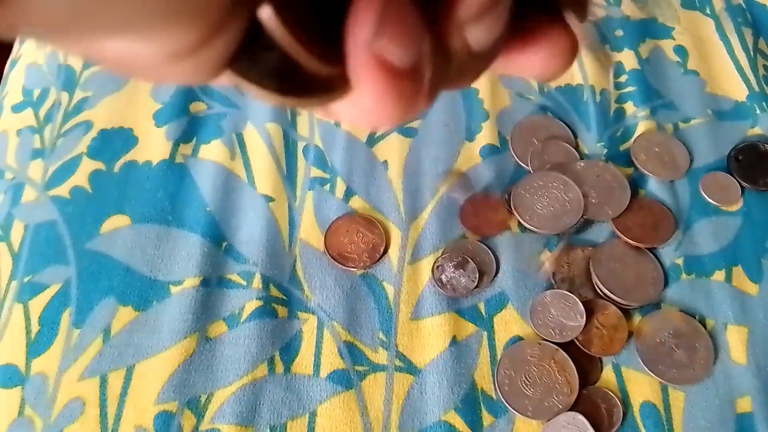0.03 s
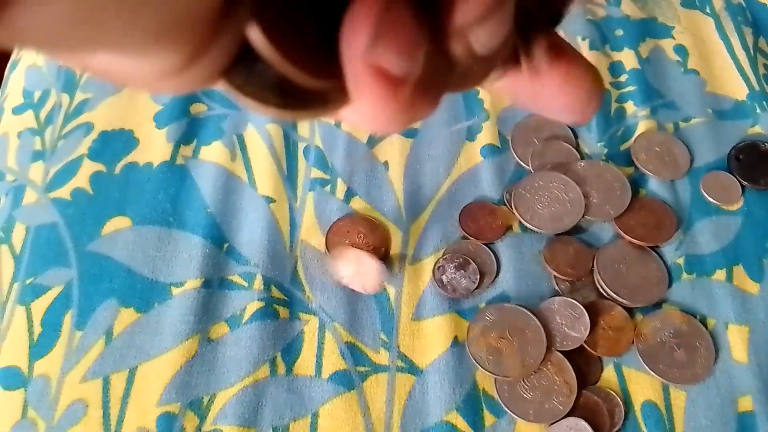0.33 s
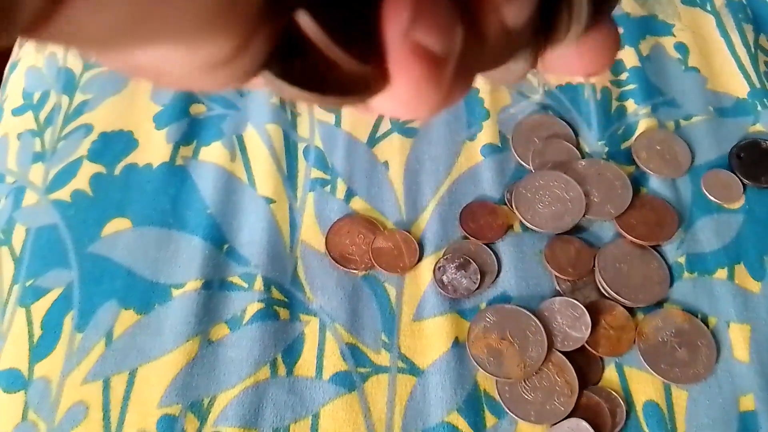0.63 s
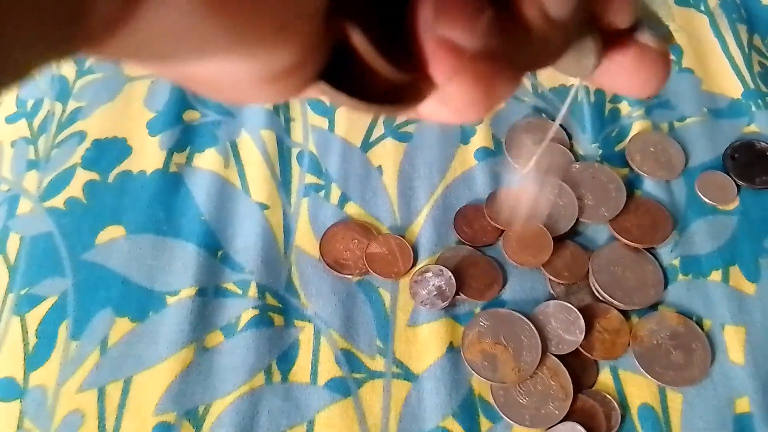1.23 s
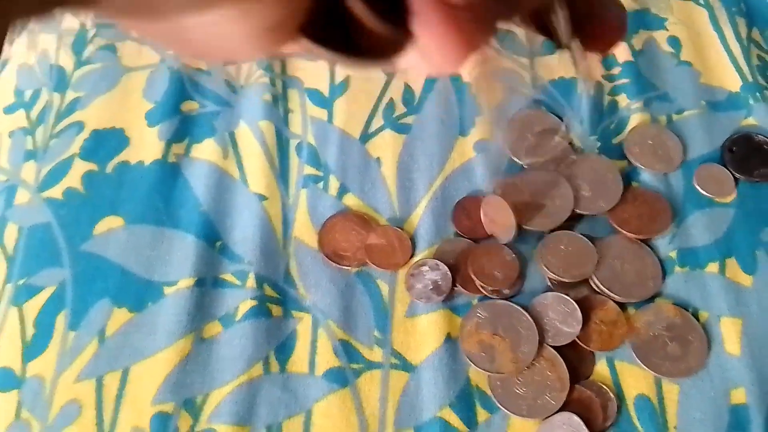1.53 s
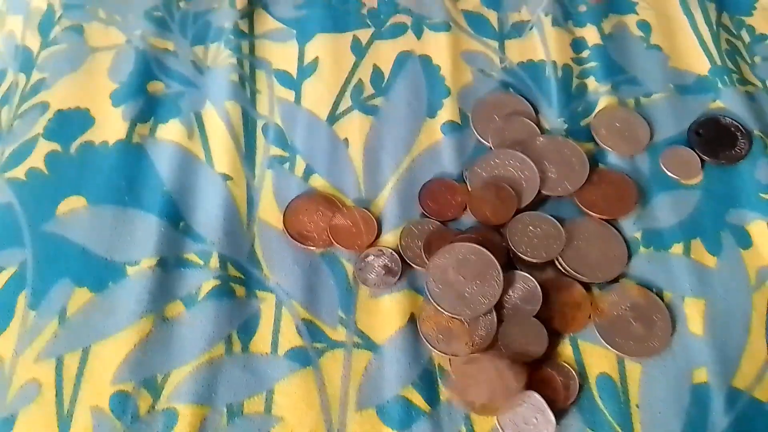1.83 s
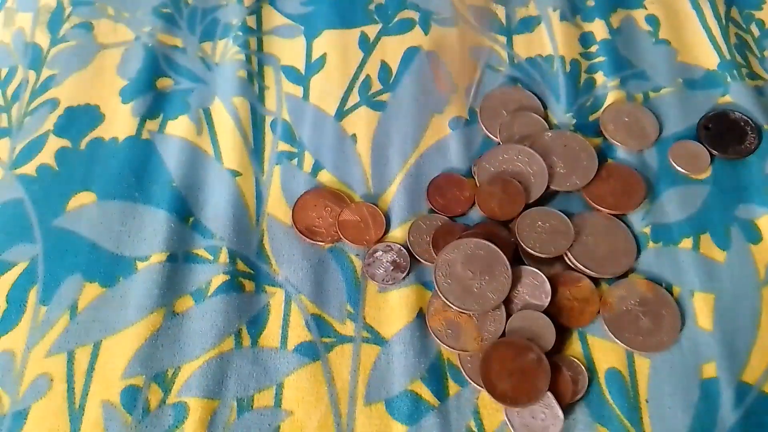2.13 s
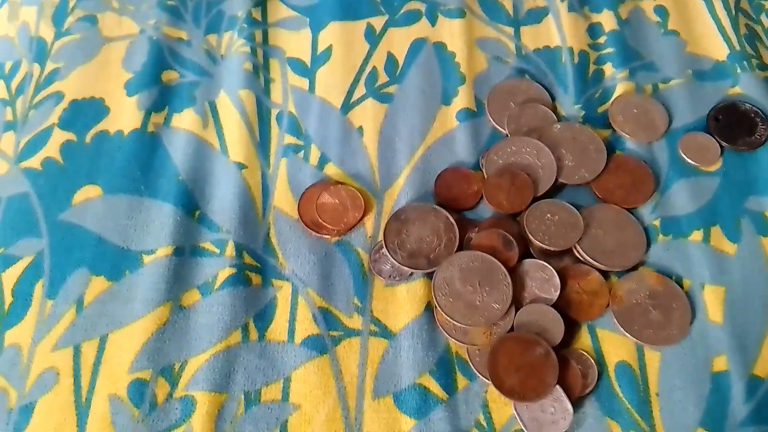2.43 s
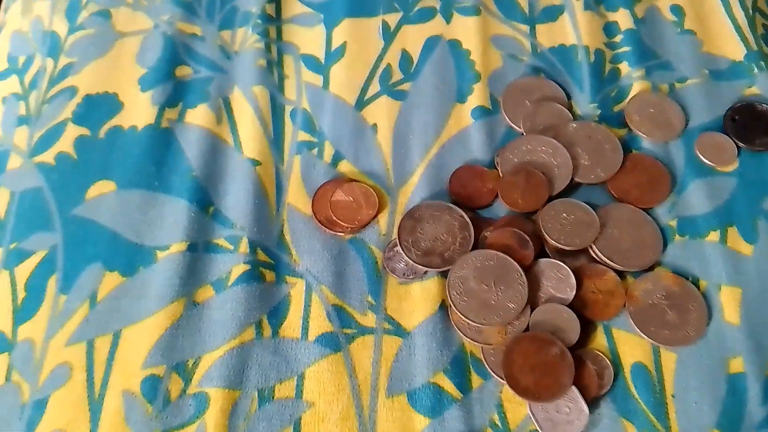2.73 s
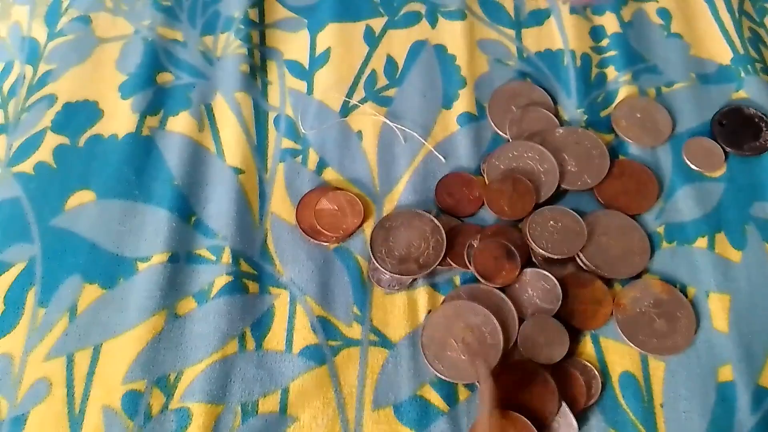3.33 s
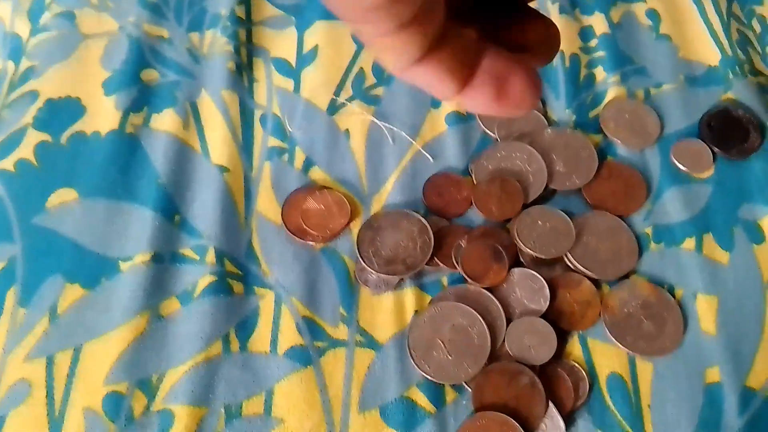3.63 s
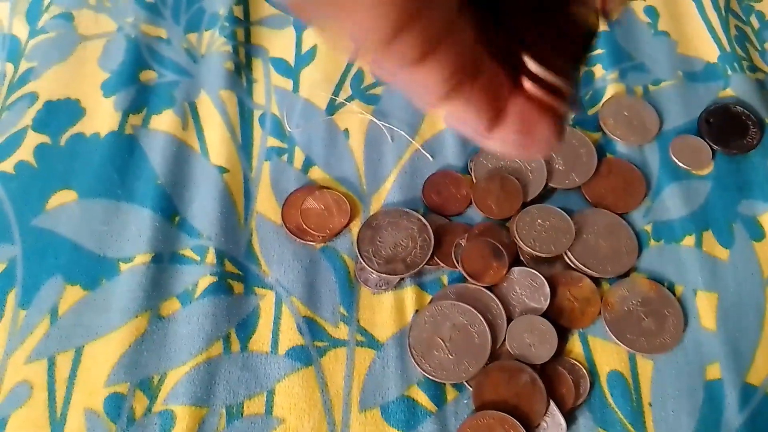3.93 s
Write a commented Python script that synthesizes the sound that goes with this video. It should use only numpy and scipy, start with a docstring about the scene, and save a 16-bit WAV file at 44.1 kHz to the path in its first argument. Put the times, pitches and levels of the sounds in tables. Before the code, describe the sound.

Coins fall from a hand onto a pile of coins on cloth, clinking in irregular clusters with brief, bright ringing. Faint ticks and scrapes come between the drops. The close microphone overloads slightly in a quiet room.

```python
"""Coins dropped on a pile of coins

Coins fall from a hand onto a pile on cloth, right under a small microphone in a quiet room.
Each impact excites a coin's high modes of free vibration and jostles its neighbours into tiny pings.
It also overloads the microphone, whose nonlinear response adds a crunch, a thump and difference tones.
Between the drops, coins shift against each other with faint ticks and scrapes."""
import sys
import numpy as np
from scipy import signal
from scipy.fft import rfft, irfft
from scipy.io import wavfile

SR = 44100
rng = np.random.default_rng(int(sys.argv[2]) if len(sys.argv) > 2 else 0)


def master_out(mix):
    """Clip the mix to full scale and print it as 16-bit PCM to the path in sys.argv[1]."""
    frames = np.transpose(np.atleast_2d(mix))
    ceiling = np.clip(frames, -1, 1)
    pcm = np.round(ceiling * 32767).astype(np.int16)
    wavfile.write(sys.argv[1], SR, pcm)


N = 176400

# impacts of coin on coin; the sag is the fall of the crunch over its length, the thump is relative to it:
# start_s, crunch_db, crunch_length_s, sag_db, thump_db, coin, ring_db, ring_length_s
IMPACTS = [ (0.0661, -16.5, 0.028, 38, -2.5, "l", -45.5, 0.24),
           (0.1539, -14.5, 0.14, 16.5, 0, "a", -36.5, 0.53), (0.271, -25, 0.0089, 1.5, -4, "a", -30.5, .17),
           (.385, -16.5, 0.0038, 8.5, 6, "j", -34, 0.31), (0.4195, -21, 0.0019, 3, 3, "k", -65, 0.044),
           (0.4256, -17.5, 0.011, 9, 1, "j", -40, .25), (0.776, -30.5, 0.0021, 0.5, 0.5, "l", -57, 1),
           (.851, -22.5, 0.0024, -3.5, -6, "l", -43, .15), (.874, -18, 0.015, 15, 7.5, "b", -44, .1),
           (.887, -14.5, 0.089, 11.5, -1, "b", -47, 0.14), (0.94, -27, 0.033, 1, -15, "b", -53, .2),
           (0.98, -22.5, 0.024, 4, 1, "b", -52, 0.16), (1.022, -20, 0.0078, 19.5, 4, "c", -47, 0.13),
           (1.032, -36, 0.013, 5, -13, "c", -52, 0.068), (1.246, -17, 0.055, 19.5, 4, "c", -44.5, 0.31),
           (1.329, -26.5, 0.0008, 5, 2, "c", -58, 0.088), (1.373, -28, .004, 10, -1, "c", -52, .1),
           (1.379, -23, 0.0066, 8, -5, "c", -47, 0.087), (1.3922, -14, 0.086, 9.5, -1, "d", -38.5, 0.63),
           (1.555, -16.5, 0.072, 6, -1, "d", -46, 0.39), (1.619, -15, 0.069, 6, 2, "e", -36, 0.4),
           (1.690, -16, 0.0077, 6, 0.5, "d", -44, 0.33), (1.727, -22, 0.0073, 15.5, -6, "f", -44.5, 0.36),
           (1.79, -32, 0.0015, 0.5, -5, "f", -48, 0.18), (1.83, -27.5, 0.011, 6, -6, "f", -29, 0.26),
           (1.844, -21.5, 0.054, 2, -4.5, "f", -38.5, 0.28), (2.161, -14, 0.078, 9.5, 1.5, "g", -38, 0.32),
           (2.242, -18, 0.02, 4, -2, "g", -48.5, 0.25), (2.282, -41, .003, 7, -3, "c", -41, 0.034),
           (2.492, -22, .001, 7.5, 1, "h", -40, 0.27), (2.517, -26.5, 0.00064, 2.5, 3, "h", -51, .25),
           (2.5997, -23.5, 0.01, 3.5, -2.5, "h", -34, 0.12), (2.816, -17.5, .014, 9, -8, "h", -34, 0.17),
           (2.867, -20.5, 0.0075, 3, -2, "i", -41, 0.12), (2.892, -17.5, 0.017, 8, -6.5, "h", -35, 0.16),
           (2.918, -24, 0.0015, 2.5, -8, "i", -39.5, 0.074), (2.956, -32, 0.0018, 10, -11, "k", -54, .08),
           (2.974, -29, 0.0029, 4, -9, "i", -37, 0.1), (3.010, -16, 0.062, 9.5, 5.5, "g", -35, 0.35),
           (3.070, -16, .026, 3.5, -18, "e", -38, 0.44), (3.096, -15.5, 0.05, 3, 6.5, "e", -34, 0.42),
           (3.151, -16.5, 0.048, 3.5, -1, "g", -51, .3), (3.19, -23.5, 0.042, -3.5, 0.5, "g", -35.5, 0.21),
           (3.2234, -11.5, .009, 14, -9, "b", -50, 0.087), (3.255, -22, 0.0072, -6, -10, "e", -29.5, 0.19),
           (3.275, -30.5, 0.0054, 2, 3, "k", -43, 0.18), (3.292, -24, 0.014, 12, -15, "h", -46, .3),
           (3.6177, -17, 0.0055, 7.5, -19, "k", -37, 0.034), (3.637, -33, 0.016, 0, 4, "k", -41.5, 0.11),
           (3.643, -14.5, 0.0048, 13, -2, "e", -39, 0.073), (3.667, -19.5, 0.0022, 23, -4, "k", -45, .05),
           (3.676, -25, .001, 13, -6, "k", -47, 0.058), (3.691, -18, 0.0047, 14, -9, "k", -47, .07),
           (3.828, -18.5, 0.0027, 15.5, -5, "k", -37, .06), (3.833, -20.5, 0.0074, 9.5, 0, "k", -41, .06)]
ATTACK_S = 0.00052


def undb(db):
    """Amplitude ratio of a level in decibels."""
    return 10 ** (np.asarray(db) / 20)


def noise(spectrum):
    """White noise filtered to a spectrum of (frequency_hz, level_db) points, at rms 1."""
    hz, db = np.array(spectrum).T
    bins_hz = np.maximum(np.arange(N // 2 + 1) * SR / N, 1)
    gain = undb(np.interp(np.log(bins_hz), np.log(hz), db))
    x = irfft(rfft(rng.standard_normal(N)) * gain, N)
    return x / x.std()


def wander(rate_hz):
    """Random modulation of standard deviation 1, interpolated between rate_hz values a second."""
    x = np.interp(np.arange(N) * rate_hz / SR, np.arange(N), rng.standard_normal(N))
    return x / x.std()


def since(start, length):
    """Sample indices of an event, and their age in seconds."""
    i = np.arange(max(int(start * SR) + 1, 0), min(int((start + length) * SR), N))
    return i, i / SR - start


def room():
    """Background noise: a steady broadband hiss and a low hum that wavers by phase modulation."""
    # spectrum of the hiss: frequency_hz, level_db
    hiss_spectrum = [(15, -19), (50, -12), (120, -18), (300, -13), (400, -19.5), (750, -17.5), (1000, -21),
                     (2200, -15.5), (3500, -24.5), (6000, -38.5), (7200, -34), (9500, -44), (11000, -52),
                     (14400, -46), (16000, -56)]
    partials = [(86, -66.5), (170, -58.5), (258, -59.5), (340, -62.5)]  # pitch_hz, level_db
    t = np.arange(N) / SR
    hum = sum(undb(db) * np.sqrt(2) * np.sin(2 * np.pi * hz * t + 0.92 * wander(24))
              for hz, db in partials)
    return undb(-50) * noise(hiss_spectrum) + hum


def shifting():
    """Light contact and sliding friction between coins make decaying ticks and uneven scrapes of noise."""
    # ticks of shifting coins: start_s, level_db
    ticks = [(0.5235, -30), (0.6374, -30.5), (0.6536, -31), (0.6686, -33), (0.7008, -42), (0.755, -33),
             (0.8101, -25), (0.8171, -25), (1.0644, -37), (1.1727, -41), (2.0108, -46), (2.0394, -36.5),
             (2.0607, -41), (2.455, -34), (2.4686, -25), (2.4975, -17.5), (2.5095, -24.5), (2.519, -23),
             (2.575, -29), (2.8564, -43), (3.3352, -25.5), (3.3564, -28.5), (3.4506, -32), (3.578, -29.5),
             (3.7035, -37), (3.7104, -34), (3.8203, -22)]
    # coins sliding in the hand and on the pile: start_s, end_s, level_db
    slides = [(0, 0.105, -50.5), (0.607, 0.88, -61.5), (1.014, 1.11, -52), (1.99, 2.09, -67),
              (2.267, 2.372, -60), (2.38, 2.687, -54), (2.806, 2.983, -46), (3.236, 3.43, -55),
              (3.616, 3.717, -44), (3.79, 3.861, -47.5)]
    # spectrum of ticks and scrapes alike: frequency_hz, level_db
    contact_spectrum = [(500, -27), (3000, -6), (5000, -5), (7300, 2.5), (9500, -4.5), (12500, -23),
                        (15500, -12)]
    tick_decay_s = 0.0017
    ticking, scraping = np.zeros(N), np.zeros(N)
    for start, db in ticks:
        i, t = since(start, .03)
        ticking[i] += undb(db - 7) * np.exp(-t / tick_decay_s)
    for start, end, db in slides:
        i, t = since(start, end - start)
        scraping[i] += undb(db) * np.sqrt(np.abs(np.sin(np.pi * t / (end - start))))
    grain = undb(6 * np.minimum(wander(330), 2))
    grain /= np.sqrt(np.mean(grain ** 2))
    return (ticking + scraping * grain) * noise(contact_spectrum)


def overload():
    """Overload distortion: each impact drives the microphone into a crunch and thump that sag, then stop."""
    # spectrum of the broadband crunch: frequency_hz, level_db
    crunch_spectrum = [(150, -4.5), (400, -2.5), (900, -3), (1700, 0), (2800, -3.5), (4400, -9.5),
                       (5300, -15.5), (6500, -21.5), (9000, -25), (12000, -30.5), (14000, -34.5),
                       (15700, -26.5)]
    # spectrum of the low thump: frequency_hz, level_db
    thump_spectrum = [(15, -6.5), (40, 1.5), (100, -1.5), (140, -4), (230, -0.5), (450, -8), (900, -9),
                      (3000, -50)]
    snap_s, release_s, rattle_s = 0.00057, 0.0016, 0.016  # time constants
    crunch_power, thump_power = np.zeros(N), np.zeros(N)  # incoherent sounds add in power
    for start, db, length, sag_db, thump_db, *_ in IMPACTS:
        i, t = since(start, length + .12)
        sag = undb(-sag_db * np.minimum(t / length, 1) ** 1.47)
        snap = 1 + 0.44 * np.exp(-t / snap_s)  # extra bite at the instant of contact
        envelope = undb(db) * np.minimum(t / ATTACK_S, 1) * sag * snap
        after = np.maximum(t - length, 0)
        release = np.exp(-after / release_s)
        rattle = undb(-21) * np.exp(-after / rattle_s)
        crunch_power[i] += (envelope * (release + rattle)) ** 2
        thump_power[i] += (envelope * release * undb(thump_db)) ** 2 * sag
    grain = undb(1.03 * wander(169.5) + 0.73 * wander(1500))  # flutter and finer spikes
    grain /= np.sqrt(np.mean(grain ** 2))
    crunch = undb(-1.5) * np.sqrt(crunch_power) * noise(crunch_spectrum)
    thump = undb(-4.5) * np.sqrt(thump_power) * noise(thump_spectrum)
    return grain * (crunch + thump)


def ringing():
    """Free vibration: a struck coin rings in beating pairs of modes as it rocks, damped by the cloth."""
    # normal modes of each coin: pitch_hz, level_db
    modes = { "a": [(7224, 1), (9975, -15), (12200, -14), (15116, -18)], "b": [(6735, 2.5), (8979, -15),
             (10110, 8), (10680, 4), (11100, -14)], "c": [(10137, 1.5), (10610, -3), (13092, -4)],
             "d": [(6110, -23), (6891, -6), (8123, -9), (10524, -20), (11133, -9)], "e": [(6013, -18),
             (7197, -28), (9920, -12), (11575, -5), (12263, -13)], "f": [(9728, -22), (9921, 3.5)],
             "g": [(8137, 3.5), (9970, -1.5), (10680, -25), (11590, -26), (12610, -22)], "h": [(8527, -13),
             (12800, -13), (12931, -12), (14760, -5), (15735, -13)], "i": [(8485, 1.5), (8300, -1),
             (12800, -18), (14734, -6)], "j": [(12602, -18)], "k": [(6971, -8), (7623, -4), (9200, -2),
             (11256, -13), (14368, -4), (15682, -5)], "l": [(11133, -3)]}
    fall_db, steepening = 112, 1.69  # decay over the ring length, faster as the coin settles
    jitter_hz, mean_split_hz = 21.9, 40
    out = np.zeros(N)
    jitter_cycles = np.cumsum(jitter_hz * wander(250)) / SR
    rocking = undb(3.5 * wander(130))
    for start, *_, coin, db, length in IMPACTS:
        i, t = since(start, length)
        envelope = undb(db - 1 - fall_db * (t / length) ** steepening) * np.minimum(t / ATTACK_S, 1)
        for (hz, mode_db), (split, offset, weight) in zip(modes[coin], rng.random((8, 3))):
            scatter_db = 6 * weight - 1.5  # each blow weights the modes differently
            gain = undb(mode_db + scatter_db) * rocking[(i + int(offset * N)) % N]
            phase = 2 * np.pi * (hz * t + offset + jitter_cycles[i])
            twin_phase = phase + 2 * np.pi * mean_split_hz * (split + .5) * t
            out[i] += envelope * gain * (np.sin(phase) + 0.33 * np.sin(twin_phase))
    return out


def jostling():
    """Secondary collisions: neighbouring coins give heavily damped pings during and just after an impact."""
    low_hz, high_hz, pings_per_s, t60_s = 5640, 12730, 180, 0.0061
    settle_s, settle_fall_db = .045, 16
    out = np.zeros(N)
    for start, db, length, sag_db, *_ in IMPACTS:
        span = length + settle_s
        for wait, pitch, size in rng.random((64, 3))[:int(pings_per_s * span)]:
            age = wait * span
            i, t = since(start + age, t60_s)
            fall_db = sag_db * min(age / length, 1) + settle_fall_db * max(age - length, 0) / settle_s
            ping_db = db - 19.5 + 16 * size - fall_db
            hz = low_hz + pitch * (high_hz - low_hz)
            out[i] += undb(ping_db - 60 * t / t60_s) * np.sin(2 * np.pi * hz * t)
    return out


def difference_tones():
    """Intermodulation: very high modes beat in the overloaded microphone, heard as brief lower tones."""
    # prominent tones while a coin rings hard: start_s, length_s, pitch_hz, level_db
    tones = [(.429, 0.0066, 3320, -23.5), (0.424, 0.012, 1750, -29), (0.959, 0.014, 1107, -22),
             (.96, 0.024, 4460, -30.5), (1.83, 0.0153, 1556, -21), (1.848, 0.034, 1548, -16.5),
             (2.599, 0.016, 1658, -27), (2.598, 0.014, 2770, -25.5), (2.815, 0.014, 1159, -22),
             (2.817, .012, 3020, -32), (2.867, 0.0077, 1660, -23), (2.896, 0.0164, 2580, -30),
             (2.896, 0.017, 3830, -32), (2.973, 0.0038, 2220, -24.5), (3.013, 0.019, 1753, -17),
             (3.618, 0.0039, 2040, -23), (3.643, 0.0055, 2100, -22)]
    edge_s = 0.0015
    out = np.zeros(N)
    waver_hz = 58.4 * wander(300)
    for start, length, hz, db in tones:
        i, t = since(start, length)
        envelope = undb(db - 1.5) * np.clip(np.minimum(t, length - t) / edge_s, 0, 1)
        out[i] += np.sqrt(2) * envelope * np.sin(2 * np.pi * np.cumsum(hz + waver_hz[i]) / SR)
    # stray tones of random pitch come and go through each long crunch
    low_hz, high_hz, strays_per_s, stray_s = 444.5, 4110, 85, .02
    for start, db, length, sag_db, *_ in IMPACTS:
        for wait, pitch in rng.random((24, 2))[:int(strays_per_s * length)]:
            age = wait * max(length - stray_s, 0)
            i, t = since(start + age, stray_s)
            hz = low_hz + pitch * (high_hz - low_hz)
            fall_db = sag_db * (age + stray_s / 2) / length
            gain = undb(db - 6.5 - fall_db) * (1 - pitch / 2)
            out[i] += gain * np.sin(np.pi * t / stray_s) * np.sin(2 * np.pi * hz * t)
    return out


def scene():
    """Superposition: all sources add in one channel."""
    return (overload() + ringing() + jostling() + difference_tones() + shifting() + room())[None]


def record(dry):
    """Soft saturation rounds the peaks, and a steep low-pass filter limits the bandwidth."""
    ceiling, cutoff_hz = 0.95, 15700
    lowpass = signal.ellip(10, .2, 80, cutoff_hz, fs=SR, output="sos")
    return signal.sosfilt(lowpass, ceiling * np.tanh(dry / ceiling))


dry = scene()
out = record(dry)
master_out(out)
```